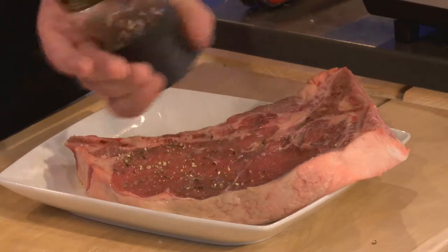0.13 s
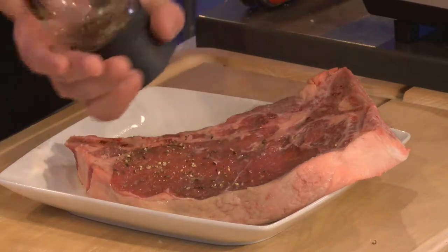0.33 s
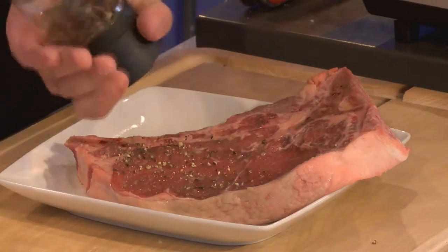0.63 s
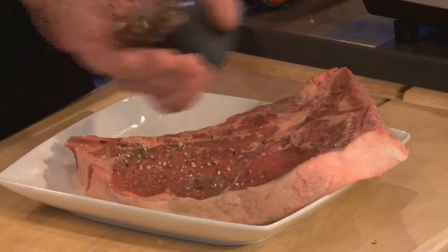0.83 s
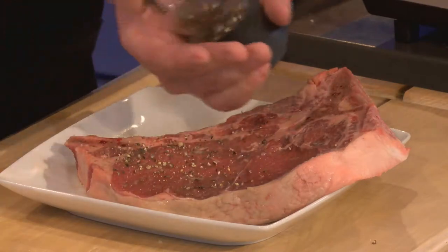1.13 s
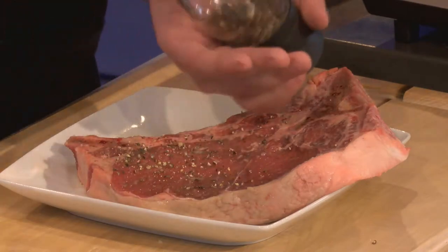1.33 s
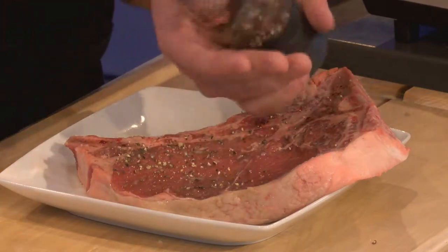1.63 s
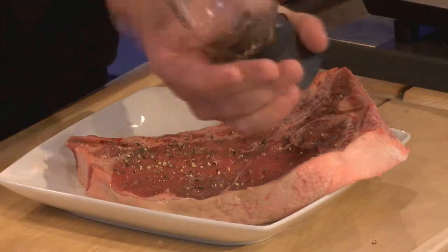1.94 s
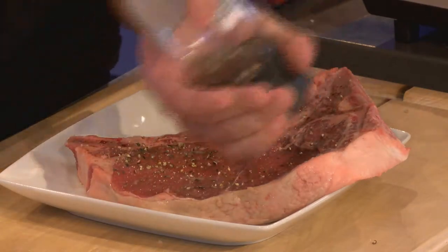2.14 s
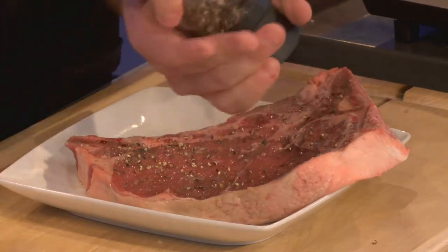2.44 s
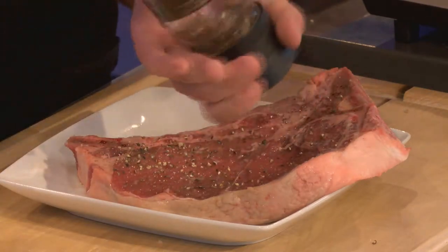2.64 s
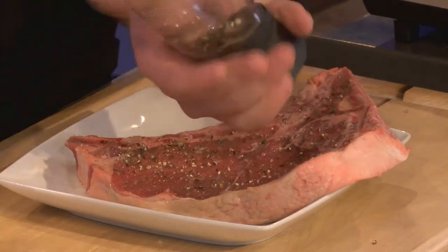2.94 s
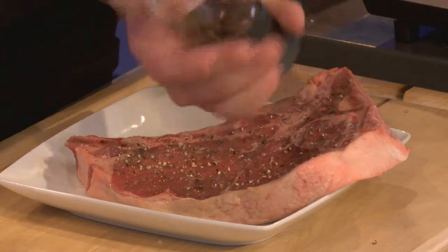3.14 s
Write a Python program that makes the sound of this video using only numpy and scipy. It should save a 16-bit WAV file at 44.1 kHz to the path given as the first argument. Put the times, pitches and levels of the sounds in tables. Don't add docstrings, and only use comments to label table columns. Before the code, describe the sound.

A pepper mill twisted by hand crunches peppercorns in short dry strokes, close up, quiet kitchen

```python
import sys
import numpy as np
from scipy import signal
from scipy.fft import rfft, irfft, next_fast_len
from scipy.io import wavfile
from scipy.ndimage import uniform_filter1d, map_coordinates

SR = 44100
rng = np.random.default_rng(int(sys.argv[2]) if len(sys.argv) > 2 else 0)


def elevation(decibels):
    levels = np.asarray(decibels, float)
    return 10 ** (levels / 20)


def wav_out(sig):
    wavfile.write(sys.argv[1], SR, np.round(np.clip(np.atleast_2d(sig).T, -1, 1) * 32767).astype(np.int16))


N = 145530

# pitch [Hz], width [Hz], level [dB].
HOLLOW = [
    (292, 108, -1.5),
    (1142, 75.7, 1),
    (546, 460, -12.5),
]
# pitch [Hz], width [Hz], level [dB].
BURR = [
    (2034, 840, -2.5),
    (3887, 650, -0.5),
    (6340, 1400, -8),
    (8600, 2200, -16),
    (12900, 6900, -23),
]


def unit(x):
    return x / np.sqrt(np.mean(x ** 2) + 1e-20)


def along(points, hz):
    f, v = np.transpose(points)
    return np.interp(np.log(hz + 1), np.log(f + 1), v)


def wobble(rate):
    return map_coordinates(rng.standard_normal(1000), [np.arange(N) * rate / SR])


def filtered(x, response):
    m = next_fast_len(N + 8192)
    return irfft(rfft(x, m) * response(np.fft.rfftfreq(m, 1 / SR)), m)[..., :N]


def peak(hz, width_hz):
    return lambda f: 1j * f * width_hz / (hz * hz - f * f + 1j * f * width_hz)


def struck(times, levels_db, t60, body, size):
    attack_s, scatter_db = 0.0003, 1.5
    k = np.arange(size)
    crumble = elevation(-60 * k / SR / t60)
    sharp_break = 0.8 * elevation(-240 * k / SR / t60)
    rise = 1 - np.exp(-(k + 1) / SR / attack_s)
    burst = rng.standard_normal((len(times), size)) * (crumble + sharp_break) * rise
    burst /= np.linalg.norm(burst, axis=1, keepdims=True)
    luck = np.clip(rng.standard_normal((len(times), len(body))), -2, 2)
    start = np.round(np.asarray(times) * SR).astype(int)
    where = np.clip((start[:, None] + k).ravel(), 0, N)

    out = np.zeros(N)
    power = np.abs(rfft(burst, 1024)) ** 2
    f = np.fft.rfftfreq(1024, 1 / SR)
    for j, (hz, width_hz, db) in enumerate(body):
        shape = np.abs(peak(hz, width_hz)(f)) ** 2
        caught = np.sqrt(np.clip(power @ shape / shape.sum(), 0.1, None))
        gain = elevation(levels_db + db + scatter_db * luck[:, j])
        pushes = burst / caught[:, None] * gain[:, None]
        drive = np.bincount(where, pushes.ravel(), N + 1)
        out += (-1) ** j * filtered(drive[:N], peak(hz, width_hz))
    return out


def rung(times, levels_db, hz, width_hz):
    where = np.clip(np.round(times * SR).astype(int), 0, N - 1)
    taps = np.bincount(where, elevation(levels_db) * rng.choice([-1., 1.], len(times)), N)
    return filtered(taps, peak(hz, width_hz))


def grains(count, size_db, lump_db, body):
    biggest = 2.2
    levels_db = size_db * np.minimum(rng.exponential(size=count), biggest)
    times = rng.uniform(0, N / SR, count)
    impacts = struck(times, levels_db, t60=0.003, body=body, size=64)
    return unit(impacts * elevation(lump_db * np.clip(wobble(110), -2, 2)))


def gate(runs):
    edge_s = 0.008
    t = np.arange(N) / SR
    gain = np.zeros(N)
    for run in runs:
        s, db = np.transpose(run)
        gain += elevation(np.interp(t, s, db)) * (t >= s[0]) * (t < s[-1])
    return uniform_filter1d(gain, max(1, int(edge_s * SR)))


def grind():
    # start [s], length [s], grit level [dB].
    twists = [
        (0.224, 0.15, -34),
        (0.6, 0.15, -31.5),
        (0.998, 0.17, -38),
        (1.38, 0.14, -30.5),
        (1.763, 0.11, -32.5),
        (2.501, 0.07, -35.5),
        (2.674, 0.149, -30.5),
        (2.889, 0.16, -48),
        (3.124, 0.08, -32.5),
    ]
    rise_share, start_db, end_db = 0.33, -13.5, -13.5
    grit_db, ring_db, wrist_db, wrist_hz = -5, -6.5, -18, 162

    grit = grains(count=7000, size_db=4, lump_db=2.5, body=BURR)
    ring = grains(count=3000, size_db=4, lump_db=2.5, body=HOLLOW)
    wrist = unit(filtered(rng.standard_normal(N), lambda f: 1 / (1 + (f / wrist_hz) ** 2)))
    effort = gate([[(s, db + start_db), (s + rise_share * length, db), (s + length, db + end_db)]
                   for s, length, db in twists])
    return effort * (elevation(grit_db) * (grit + elevation(ring_db) * ring) + elevation(wrist_db) * wrist)


def cracks():
    # start [s], dull snap [dB], bright snap [dB], wall ring [dB], air thump [dB].
    corns_a = [(0.0083, -32, -41, -31, -43), (0.156, -50, -33, -34, -32), (0.2316, -39, -31.0, -35, -23.5),
               (0.2478, -18, -13, -19, -28), (0.2656, -18.0, -11.5, -20, -25),
               (0.2753, -10, -9.5, -18, -35), (0.2825, -16, -10, -11, -20),
               (0.2963, -22, -10.5, -14, -24.0), (0.303, -25, -16, -25.0, -25),
               (0.3233, -23, -17, -20.0, -25), (0.3413, -18, -19, -16.5, -23),
               (0.3473, -22, -19.5, -19, -35.0), (0.3649, -25.5, -34, -28.0, -31.0),
               (0.5581, -31.0, -29.0, -24.0, -27.5), (0.6057, -28, -30, -25, -41),
               (0.6134, -34, -27.0, -35, -34.0), (0.6227, -17, -25, -24, -21.0),
               (0.6326, -14, -16.0, -25, -24), (0.6383, -12, -24, -21, -20),
               (0.6465, -28, -12.5, -27, -13.5), (0.6506, -16, -9, -25, -13.5),
               (0.6571, -17.0, -14, -23, -23), (0.662, -18.5, -12, -15, -27.0),
               (0.6712, -7, -5.5, -12, -23), (0.6778, -14, -12.5, -6.5, -16),
               (0.6927, -19, -12.5, -27.0, -33), (0.7125, -13.5, -16.5, -19, -23),
               (0.7288, -19, -22, -18, -23.0)]
    corns_b = [(0.914, -36, -39, -23.5, -27.5), (0.942, -33, -32.5, -36, -32.5),
               (1.0266, -27, -22.0, -18, -27), (1.048, -21, -17.5, -26, -26), (1.0555, -15, -18, -38, -22),
               (1.0621, -19, -28, -29, -22.0), (1.0698, -22, -26, -22, -20), (1.0887, -21, -21, -30, -29),
               (1.0933, -17, -7.0, -9.5, -14), (1.1023, -25, -4.5, -8.5, -19),
               (1.1297, -17.5, -16.5, -29, -39), (1.138, -21.5, -17, -15.5, -26.5),
               (1.2832, -23.5, -41, -20.5, -30), (1.3833, -19.0, -19.0, -40, -20),
               (1.3989, -16, -18.0, -15.0, -21), (1.4062, -16, -3, -4.5, -9), (1.4201, -26, -20, -30, -18),
               (1.4335, -13, -21, -14.5, -22), (1.45, -1, -3, -6, -10.5), (1.458, -9, -6, -8, -22),
               (1.469, -17, -11.5, -15, -17.5), (1.4795, -14.0, -14.0, -13.5, -22.0),
               (1.4945, -24, -23, -19.0, -30), (1.6672, -38.0, -47, -28, -34), (1.702, -33, -39, -36, -40)]
    corns_c = [(1.7695, -12, -16.5, -32, -28), (1.777, -9, -7.5, -14, -22), (1.7865, -20, -24, -23, -30),
               (1.802, -10.5, -15, -23, -20.5), (1.8075, -6, -30, -22, -22.5),
               (1.8137, -14.5, -5.5, -15, -25), (1.8348, -17.5, -19, -13, -26),
               (1.845, -15, -11.5, -18, -19.5), (1.8605, -16, -26, -33, -41),
               (2.1141, -31, -40, -46.0, -40.0), (2.2526, -41, -35, -27.5, -35),
               (2.503, -29, -29, -37, -38), (2.5145, -24, -16, -30, -21), (2.5235, -17, -12, -19, -22),
               (2.5314, -17.5, -5.5, -14.5, -17.5), (2.5451, -20, -14.5, -25, -24)]
    corns_d = [(2.6559, -30.5, -33, -41, -46), (2.6845, -23.5, -19.5, -30, -26),
               (2.6975, -20, -22, -20.0, -22.5), (2.7103, -5.5, -0.5, -9, -10),
               (2.731, -13, -14, -12.5, -32), (2.7447, -13.0, -6, -13, -12.0), (2.7606, -7.5, -11, -8, -17),
               (2.7742, -20, -11, -18.0, -32.0), (2.78, -14.0, -8, -13, -15.5),
               (2.7887, -15, -18, -19, -19), (2.8071, -16.5, -10.5, -27, -24),
               (2.8644, -34, -28, -32, -23.5), (2.9212, -30, -38, -31, -40.0),
               (2.9305, -31, -40, -22.5, -39.0), (2.9363, -32, -39, -22.5, -39),
               (2.968, -20, -29.5, -25, -35), (2.9877, -39, -16, -35, -27),
               (3.1334, -21, -20, -22.0, -24.5), (3.1453, -14, -26, -26, -28),
               (3.1519, -13.5, -11, -18.0, -22.5), (3.1635, -15, -8.5, -13.5, -18.5),
               (3.177, -16.0, -22, -15, -25.0), (3.2396, -18.5, -21.0, -23.5, -26.5)]
    s, dull_db, bright_db, ring_db, thump_db = np.transpose(corns_a + corns_b + corns_c + corns_d)
    thump_db = thump_db + 21
    t60, size = 0.013, 600

    dull = struck(s, dull_db + 16, t60, BURR[:1], size)
    bright = struck(s, bright_db + 14, t60, BURR[1:2], size)
    sizzle = struck(s, (dull_db + bright_db) / 2 + 14, t60, BURR[2:], size)
    knock = struck(s, thump_db, t60, HOLLOW[2:], size)
    air, wall = HOLLOW[:2]
    ring = rung(s, ring_db + 22, *wall[:2])
    thump = rung(s, thump_db, *air[:2])
    return dull - bright + sizzle + knock + ring + thump


def hopper():
    # pitch [Hz], width [Hz], level [dB].
    thin_wall = [(1145, 85, -1), (2106, 230, -4), (3900, 1600, -6), (6490, 1370, -2), (8420, 1010, -2),
                 (14100, 5600, -12)]
    # start [s], length [s], first level [dB], last level [dB].
    tumbles = [(0, 0.23, -50.5, -69.5), (0.368, .16, -52, -64.5), (0.744, 0.13, -52, -52.5),
               (0.9, 0.091, -55, -69), (1.15, 0.203, -53, -56.5), (1.519, 0.17, -46.5, -65.5),
               (1.657, .08, -65, -56), (1.866, 0.26, -50, -61), (2.208, 0.15, -51.5, -57),
               (2.41, 0.051, -60, -65.5), (2.563, 0.066, -52, -60), (2.822, 0.22, -49, -53.5),
               (3.18, 0.17, -50.5, -50)]
    # start [s], peak level [dB].
    ticks_a = [(0.433, -38), (0.442, -35), (0.817, -31), (0.853, -38.5), (0.91, -30.5), (1.149, -33),
               (1.501, -40.0), (1.735, -44), (2.02, -36), (1.541, -44), (1.548, -38), (1.669, -34.5),
               (1.71, -29), (1.906, -44), (1.928, -42), (1.957, -28.5), (1.994, -33), (2.213, -35),
               (2.226, -36)]
    ticks_b = [(2.234, -24.5), (2.245, -26), (2.251, -26.5), (2.302, -38), (2.309, -41), (2.319, -36),
               (2.338, -34), (2.348, -27.5), (2.437, -31), (2.84, -35), (2.853, -41), (2.864, -24),
               (2.876, -25), (2.89, -28), (2.896, -38), (3.0, -34), (3.229, -41), (3.252, -35),
               (3.284, -37)]
    ticks_c = [(0.19, -41), (0.9692, -42), (2.0433, -39), (2.096, -50), (2.2038, -32), (2.2555, -28),
               (2.2835, -42), (2.3235, -31), (2.332, -33), (2.4608, -35), (2.924, -30), (3.02, -41)]

    runs = [[(s, first_db), (s + length, last_db)] for s, length, first_db, last_db in tumbles]
    patter = gate(runs) * grains(count=4000, size_db=5.5, lump_db=4, body=thin_wall)
    s, db = np.transpose(ticks_a + ticks_b + ticks_c)
    return patter + struck(s, db + 15.5, t60=0.007, body=thin_wall[2:], size=300)


def jolts():
    # start [s], peak level [dB], pitch of the push [Hz].
    pushes = [
        (.555, -50, 190),
        (1.664, -52, 200),
        (.669, -41, 65),
        (1.1, -48, 66),
        (1.446, -43.5, 65),
        (2.052, -50.5, 229),
        (2.061, -48, 230),
        (2.707, -38.5, 60.3),
    ]
    t = np.arange(N) / SR
    out = np.zeros(N)
    for s, db, hz in pushes:
        v = np.clip(t - s, 0, None) * 2 * np.pi * hz
        out += elevation(db + 16) * v * v * (3 - v) * np.exp(-v) / 2
    return out


def walls(x):
    t60, first_echo_s = 0.2, 0.004
    t = np.arange(SR // 3) / SR
    tail = rng.standard_normal(len(t)) * elevation(-60 * t / t60) * (t > first_echo_s)
    return signal.fftconvolve(x, tail / np.linalg.norm(tail))[:N]


def kitchen():
    # pitch [Hz], level [dB per Hz].
    air_colour = [(20, -5), (140, -4), (900, -25), (2200, -23.5), (5000, -26), (10000, -31.5),
                  (16000, -32.5)]
    air_db, hum_hz, hum_db = -58, 120, -68
    whine_hz, whine_width_hz, whine_db = 11630, 250, -76

    air = unit(filtered(rng.standard_normal(N), lambda f: elevation(along(air_colour, f))))
    hum = np.sin(2 * np.pi * hum_hz * np.arange(N) / SR) * elevation(3.3 * wobble(9.6))
    whine = unit(filtered(rng.standard_normal(N), lambda f: peak(whine_hz, whine_width_hz)(f) ** 2))
    return elevation(air_db + 1.5 * wobble(6)) * air + elevation(hum_db) * hum + elevation(whine_db) * whine


def scene():
    mill = grind() + cracks() + hopper()
    mono = mill + elevation(-21) * walls(mill) + jolts() + kitchen()
    return np.array([mono, mono])


def top_cut(x):
    return signal.sosfilt(signal.butter(12, 16990, fs=SR, output="sos"), x)


def record(dry):
    # pitch [Hz], left over right [dB].
    balance = [(60, -1.5), (500, -1.1), (1200, -.6), (14000, -1.1)]
    ceiling, top_hz, apart_db = 0.21, 15900, -24
    held = ceiling * np.tanh(dry / ceiling)
    turn = np.array([[1], [-1]])

    def channels(f):
        level = elevation(along(balance, f) * turn / 2)
        phase = np.exp(1j * elevation(apart_db) * turn)
        return level * phase / (1 + (f / top_hz) ** 80)

    return top_cut(filtered(held, channels))


dry = scene()
out = record(dry)
wav_out(out)
```